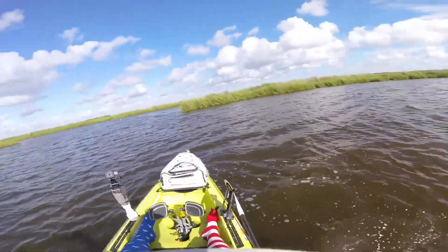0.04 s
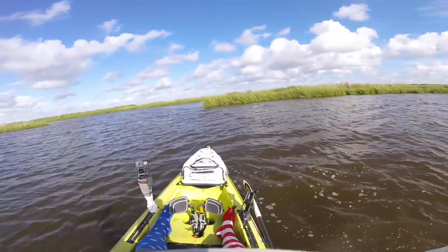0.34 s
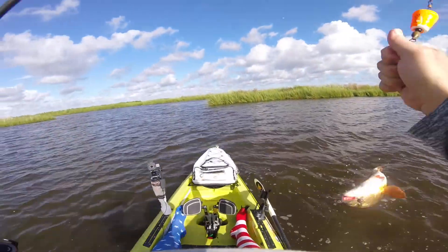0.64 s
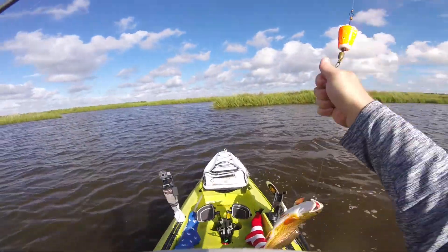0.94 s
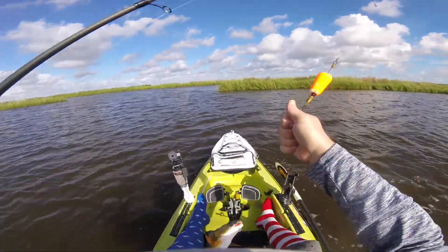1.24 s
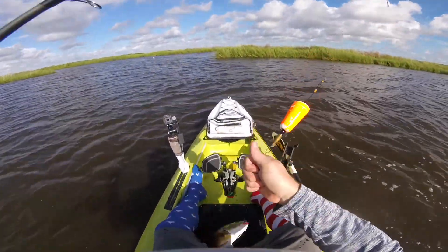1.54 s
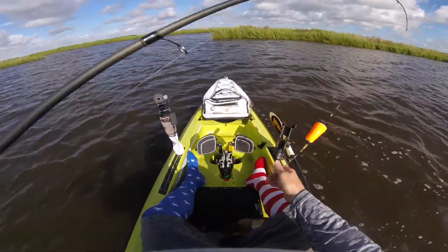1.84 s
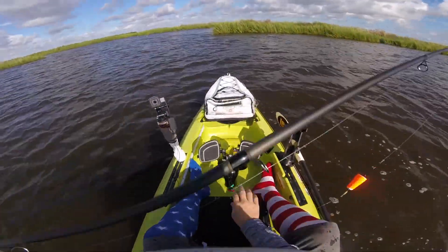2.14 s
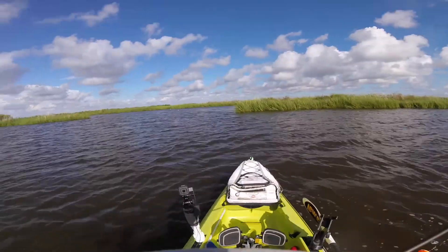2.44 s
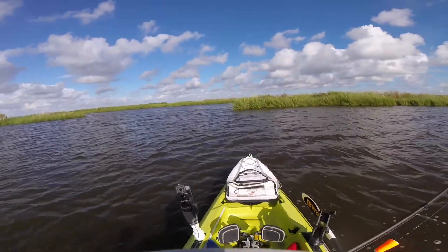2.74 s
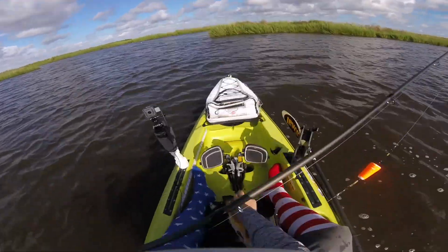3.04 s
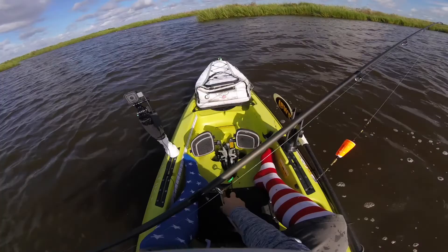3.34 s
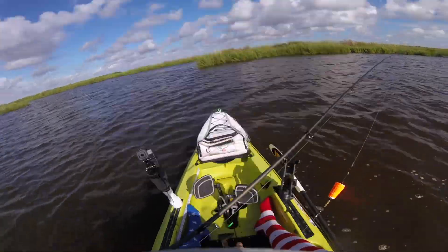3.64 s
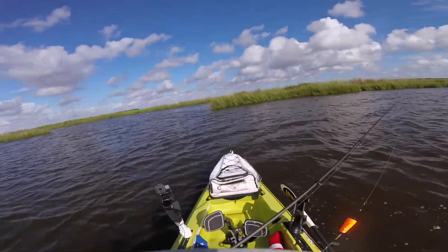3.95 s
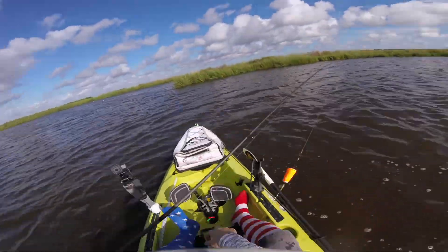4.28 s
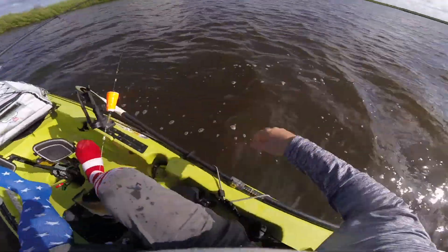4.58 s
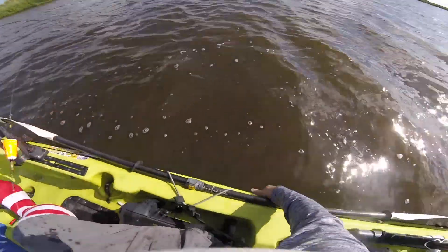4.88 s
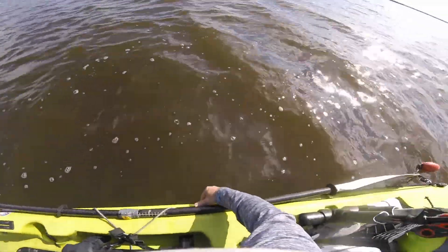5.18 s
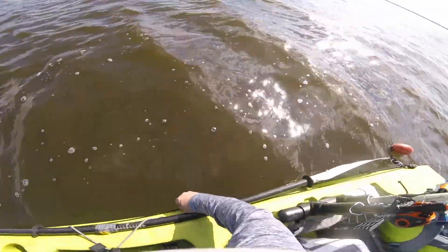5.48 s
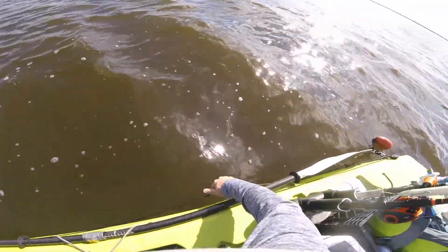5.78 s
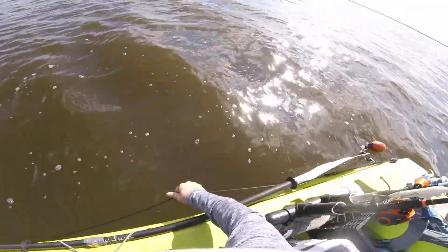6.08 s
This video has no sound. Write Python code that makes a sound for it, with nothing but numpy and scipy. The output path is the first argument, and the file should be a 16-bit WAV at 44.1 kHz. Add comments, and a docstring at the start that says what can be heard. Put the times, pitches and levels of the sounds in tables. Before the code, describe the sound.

Over low wind and rustling sleeves, beads clack brightly inside a plastic fishing float as a small fish lands in the angler's lap with soft thuds. Water gives one faint plip. Then a rod and gear knock and clatter on the hollow plastic hull of the kayak. A faint thin whistle comes and goes, and wind buffets the close microphone hard for the last two seconds.

```python
"""Over low wind and rustling sleeves, a rattle float clacks as a small fish is swung aboard a kayak.
Beads strike inside the float, the fish thuds into the angler's lap, and marsh water plips once.
Then rod and gear knock on the hollow plastic hull, each impact exciting its resonant modes.
A thin whistle comes and goes, and eddies buffet the microphone, hard in the last two seconds."""
import sys
import numpy as np
from scipy import signal
from scipy.fft import rfft, irfft
from scipy.io import wavfile
from scipy.ndimage import uniform_filter1d

SR = 44100
rng = np.random.default_rng(int(sys.argv[2]) if len(sys.argv) > 2 else 0)


def int16_out(signal):
    """Quantize to a 16-bit WAV file."""
    q = np.round(np.clip(np.atleast_2d(signal).T, -1, 1) * 32767)
    wavfile.write(sys.argv[1], SR, q.astype(np.int16))


N = 278660
TIME = np.arange(N) / SR


def amp(db):
    """The decibel scale: 20 dB is a factor of ten in amplitude."""
    return 10 ** (np.asarray(db) / 20)


def unit_rms(x):
    """Normalisation to a mean power of 1."""
    return x / np.sqrt(np.mean(x ** 2) + 1e-20)


def unit_energy(x):
    """Normalisation to a total energy of 1."""
    return x / (np.linalg.norm(x) + 1e-12)


def gain_at(spectrum, hz):
    """Spectral envelope: decibels interpolated over log frequency, returned as amplitude."""
    points_hz, level_db = np.transpose(spectrum)
    return amp(np.interp(np.log(hz + 1), np.log(points_hz + 1), level_db))


def follow(rows, column):
    """Linear interpolation of one column over time."""
    rows = np.asarray(rows)
    return np.interp(TIME, rows[:, 0], rows[:, column])


def swell(peak_s, length_s):
    """A raised-cosine envelope of height 1."""
    return np.cos(np.pi * np.clip((TIME - peak_s) / length_s, -.5, .5)) ** 2


def decay(t, t60):
    """Exponential damping: 60 dB down after t60 seconds."""
    return np.exp(-np.log(1000) * t / t60)


def add(mix, start_s, sound):
    """Superposition: a sound adds to the mix from start_s on."""
    part = mix[max(round(start_s * SR), 0):][:len(sound)]
    part += sound[:len(part)]


def noise(spectrum):
    """Spectral shaping of white noise, at rms 1."""
    gain = gain_at(spectrum, np.fft.rfftfreq(N, 1 / SR))
    return unit_rms(irfft(rfft(rng.standard_normal(N)) * gain, N))


def drift(hz):
    """Random modulation: noise of rms 1, low-passed near hz."""
    gain = np.exp(-(np.fft.rfftfreq(N, 1 / SR) / hz) ** 2)
    return unit_rms(irfft(rfft(rng.standard_normal(N)) * gain, N))


def shortest_pulse(spectrum, size=4096):
    """Minimum phase: the most compact causal pulse with this spectrum."""
    log_gain = np.log(gain_at(spectrum, abs(np.fft.fftfreq(size, 1 / SR))))
    return np.fft.ifft(np.exp(np.conj(signal.hilbert(log_gain)))).real


def jostle(bouts, edge_db, spread_db, count=6):
    """Random impacts (start_s, level_db) in each bout; edge_db sets the ends' level against the middle."""
    contacts = []
    for middle_s, length_s, db in bouts:
        place = (np.arange(count) + rng.random(count)) / count - .5
        level_db = db + edge_db * (2 * place) ** 2 + spread_db * rng.standard_normal(count)
        contacts += zip(middle_s + length_s * place, level_db)
    return contacts


def impacts(rows, modes, crack_spectrum, edges_hz, attack_s, crack_t60, crack_db, snap_db,
            tail_t60, tail_db, scatter_db, mistune=.01, heft=0):
    """Modal synthesis: damped modes plus a noisy crack. A row is start_s, then level_db for each band."""
    t, out = np.arange(SR // 5) / SR, np.zeros(N)
    hz, db, t60 = np.transpose(modes)[:, :, None]
    pulse, fade = shortest_pulse(crack_spectrum), decay(t, t60)
    crack_envelope = decay(t, crack_t60) + amp(tail_db) * decay(t, tail_t60)
    bands = [signal.butter(4, band, "band", fs=SR, output="sos") for band in zip(edges_hz, edges_hz[1:])]
    for start_s, *levels_db in rows:
        # the place of contact decides how strongly each mode answers
        place, detune = rng.standard_normal((2, len(hz), 1))
        partials = amp(db + scatter_db * place) * fade * np.sin(2 * np.pi * hz * (1 + mistune * detune) * t)
        # with heft, a heavy blow flexes the whole body and favours its lowest modes
        flex = amp(heft * max(levels_db[0] + 18.5, -10) * (hz < 350))
        ring = (flex * partials).sum(0) / np.linalg.norm(partials.sum(0))
        burst = unit_energy(rng.standard_normal(len(t)) * crack_envelope)
        snap = amp(snap_db) * (t == 0)
        crack = signal.fftconvolve(burst + snap, pulse)[:len(t)]
        blow = ring + amp(crack_db) * unit_energy(crack)
        for band, level_db in zip(bands, levels_db):
            part = signal.sosfilt(band, blow)
            attack_rms = np.sqrt(np.mean(part[:round(attack_s * SR)] ** 2))
            add(out, start_s, amp(level_db) * part / attack_rms)
    return out


# background hiss: frequency_hz, level_db
AIR_SPECTRUM = [(100, 11), (400, 15.5), (900, -2), (1500, -3.5), (3000, -5.5), (5500, -7),
                (10000, -8), (15000, -4.5)]
def air():
    """Stationary noise: the still marsh air and the microphone's own hiss."""
    return amp(-65.5) * noise(AIR_SPECTRUM)


WIND_LEVELS = [(0, -34, -53.5), (.7, -35, -46), (1.35, -30, -41), (1.8, -31, -48.5), (2.05, -41, -53),
               (2.5, -33, -51), (2.85, -35.5, -33), (3.05, -38, -38), (3.2, -34, -36.5), (3.45, -36, -46),
               (3.75, -24, -43), (4.08, -19.5, -38.5), (4.3, -14.5, -28), (4.55, -21, -27.5),
               (5.3, -19.5, -24.5), (6.05, -18.5, -28), (6.32, -15, -39)]  # wind on the microphone: time_s, buffet_db, flutter_db
GUSTS = [(0.093, 0.18, -27.5), (1.071, 0.078, -26.5), (1.189, 0.093, -11), (1.344, 0.29, -26),
         (2.786, 0.16, -21), (4.209, 0.12, -16.5), (4.388, 0.11, -18), (5.025, 0.085, -20),
         (5.561, 0.056, -18)]  # puffs from gusts and quick movements: peak_s, length_s, level_db
BUFFET_SPECTRUM = [(5, -9.5), (14, 1), (28, 1), (50, -8), (70, -16.5), (110, -24), (200, -44.5),
                   (500, -82.5)]  # large eddies: frequency_hz, level_db
FLUTTER_SPECTRUM = [(30, -15.5), (65, 6.5), (100, 5), (160, -6.5), (250, -13), (400, -22), (700, -32),
                    (1500, -51), (4000, -64.5)]  # small eddies: frequency_hz, level_db
def wind():
    """Turbulent pressure: large eddies push on the microphone port and smaller ones flutter above them."""
    eddies = noise(BUFFET_SPECTRUM)
    eddies /= np.sqrt(uniform_filter1d(eddies ** 2, size=6000) + 0.023)  # even out their own slow swell
    breeze_db = follow(WIND_LEVELS, 1)
    puffs = sum(amp(db) * swell(peak_s, length_s) for peak_s, length_s, db in GUSTS)
    gust_db = 20 * np.log10(amp(breeze_db + 1.5 * drift(8)) + puffs)
    pace = np.clip(amp(.25 * (gust_db + 22)), .4, 1.15)  # a light breeze carries eddies past more slowly
    eddies = np.interp(np.cumsum(pace), np.arange(N), eddies, period=N)
    flutter = noise(FLUTTER_SPECTRUM)
    flutter_db = follow(WIND_LEVELS, 2) + .3 * (gust_db - breeze_db) + 2 * drift(7.2)
    return eddies * amp(gust_db) + flutter * amp(flutter_db)


WHISTLES = [(0.177, .3, 4200, -66), (1.806, 0.9, 4280, -72), (2.54, 0.55, 3720, -71.5),
            (4.701, 0.59, 4450, -77), (5.248, 0.62, 3743, -75.5)]  # thin tones: start_s, length_s, pitch_hz, level_db
def whistle(fade_s=0.089):
    """Frequency modulation: a faint tone, perhaps wind on the line, sways about five times a second."""
    sway = np.sin(2 * np.pi * np.cumsum(5 + .8 * drift(4.3)) / SR)
    waver_hz = 35 * sway + 15 * drift(8.5) + 22 * drift(200)
    out = np.zeros(N)
    for start_s, length_s, pitch_hz, db in WHISTLES:
        fade = np.clip(np.minimum(TIME - start_s, start_s + length_s - TIME) / fade_s, 0, 1)
        out += amp(db) * fade * np.sqrt(2) * np.sin(2 * np.pi * np.cumsum(pitch_hz + waver_hz) / SR)
    return out


RUSTLE = [(0, -54, -62), (.9, -47.5, -62.5), (1.4, -51.5, -65), (1.7, -48.5, -62), (1.9, -62.5, -71),
          (2.45, -60.5, -73), (3.1, -55, -69.5), (4.3, -57, -67), (5.85, -62.5, -72.5), (6.32, -57.5, -69)]  # steady shifting of cloth: time_s, rub_db, hiss_db
SWISHES = [(0.536, 0.083, -43, -40), (0.602, 0.16, -35.5, -65), (1.026, 0.5, -47.5, -52.5),
           (1.226, 0.23, -37, -53), (1.51, 0.12, -47.5, -61), (3.283, 0.21, -50, -79),
           (3.573, 0.24, -51.5, -53.5), (4.121, 0.32, -47, -65), (6.147, 0.5, -60, -64)]  # spray and sleeve: peak_s, length_s, rub_db, hiss_db
# the dull rub, fine hiss and fibre ticks of cloth: frequency_hz, level_db
RUB_SPECTRUM = [(100, -8), (250, 7), (450, 3.5), (750, 1), (1300, -7), (2000, -10.5), (3200, -18.5),
                (6000, -36)]
HISS_SPECTRUM = [(1000, -8.5), (2500, 0.5), (3800, 2.5), (5000, -2), (7000, -3.5), (9000, -2.5),
                 (11500, -5), (15000, -13), (16000, -34)]
FIBRE_SPECTRUM = [(500, -13), (2000, 0.5), (4000, -1), (7500, -4), (11000, -3), (15000, -14)]
def clothing(ticks_per_s=300):
    """Friction noise: cloth rubs in uneven catches, with a hiss and tiny ticks of fibre."""
    rub_gain, hiss_gain = amp(follow(RUSTLE, 1)), amp(follow(RUSTLE, 2))
    for peak_s, length_s, rub_db, hiss_db in SWISHES:
        stroke = swell(peak_s, length_s)
        rub_gain += amp(rub_db) * stroke
        hiss_gain += amp(hiss_db) * stroke
    motion = np.clip(hiss_gain / amp(-68.5), 0, 1)  # a quiet hiss is smooth, a moving sleeve catches
    catches = drift(70) * motion
    fibres = (rng.random(N) < ticks_per_s / SR) * rng.standard_normal(N)
    fibres *= amp(3.5 * np.minimum(rng.exponential(1, N), 4))  # a few stand out
    ticks = unit_rms(signal.fftconvolve(fibres, shortest_pulse(FIBRE_SPECTRUM))[:N])
    rub = noise(RUB_SPECTRUM) * rub_gain * amp(3.7 * catches)
    hiss = (noise(HISS_SPECTRUM) + motion * ticks) * hiss_gain * amp(2.2 * catches)
    return rub + hiss


BUBBLE = (2.04, .065, 950, 1300, -48)  # a plip of water: start_s, length_s, start_hz, end_hz, level_db
def bubble():
    """Bubble resonance: one soft rising tone beside the hull."""
    start_s, length_s, start_hz, end_hz, db = BUBBLE
    out, count = np.zeros(N), round(length_s * SR)
    pitch_hz = np.linspace(start_hz, end_hz, count) + 40 * drift(250)[:count]
    add(out, start_s, amp(db) * np.hanning(count) * np.sin(2 * np.pi * np.cumsum(pitch_hz) / SR))
    return out


FLOPS = [(0.2, -48, -44, -38.5), (0.54, -54, -32.5, -39), (0.68, -60, -27.5, -41), (0.7, -67, -31.5, -52),
         (0.841, -27.5, -33.5, -45.5), (0.872, -29, -27, -39.5), (0.955, -65, -32, -34),
         (1.174, -19.5, -26.5, -45.5), (1.191, -28, -17.5, -29), (1.205, -25, -56, -35.5),
         (1.246, -33, -17.5, -38), (1.261, -34, -26, -42), (1.322, -31, -27.5, -42), (1.36, -36, -31, -69),
         (1.415, -37, -35, -73)]  # soft blows on clothing: start_s, push_db, thud_db, slap_db
LAP_BANDS = [30, 150, 600, 1500]  # bounds of push, thud and slap: edge_hz
LAP_MODES = [(49.8, 5, 0.17), (136, -5.5, 0.12), (286, 1, 0.096), (388, 1.5, 0.023), (527, -24, 0.018),
             (820, -19, 0.011)]  # resonances of the lap: pitch_hz, level_db, t60_s
LAP_CRACK = [(30, 12), (300, -3.5), (700, -7), (1500, -15.5), (4000, -3)]  # contact noise: frequency_hz, level_db
def lap_flops():
    """Damped impact: fish and arm land on a clothed lap with low thuds."""
    return amp(-0.5) * impacts(
        FLOPS, LAP_MODES, LAP_CRACK, LAP_BANDS, attack_s=0.016, crack_t60=0.097, crack_db=5.5,
        snap_db=-7.5, tail_t60=0.27, tail_db=-28.5, scatter_db=3.0)


KNOCKS = [(2.4653, -39.5, 7.5, -18), (2.5472, -40.5, 9, 1), (2.588, -24, -6.5, 2.5), (2.6069, -42.5, 12, 9),
          (2.6305, -33.5, -11, -4), (2.687, -42, -9, -10), (2.7136, -31, -9, -4), (2.7306, -20.5, -3, -4),
          (2.7362, -9, 5.5, 8), (2.7516, -28.5, -9, 4), (2.7656, -20, -18, 9), (2.7695, -28, -4, 7),
          (2.792, -37.5, 13.5, 7), (2.808, -31.5, -12, -2.5), (2.8194, -41, 4, 2), (2.8562, -38, 12, -1),
          (2.8753, -33, 5, 3), (2.8824, -27.5, -3.5, 3), (2.9034, -42, 11.5, -18), (3.0019, -44, 0, -14.5),
          (3.0841, -40.5, -8, -15), (3.179, -39.5, 16, 10), (3.216, -45.5, 14.5, 12), (3.2353, -37, 6, 9),
          (3.2938, -26, 5.5, 10.5), (3.2974, -33.5, 10.5, 5), (3.3749, -46, -6, 15), (3.4895, -37, -12, -2),
          (3.5114, -33, -6, -10), (3.5262, -26, -4, -10), (3.543, -20, 7, -6), (3.5485, -21, 4, 6.5),
          (3.5501, -18, 8.5, -15), (3.5843, -37, 14, -8), (3.604, -22.5, -29, -18), (3.6133, -31.5, 8.5, 1),
          (3.6433, -34, 2, -0.5), (3.703, -32.5, -2.5, -16), (3.8452, -46.5, 18, 0), (3.96, -40.5, 4.5, 2),
          (4.0741, -40, 3, -2), (4.2948, -41, 6.5, 7.5), (4.3584, -35, 1, 3), (4.4241, -45.5, 11, -7),
          (4.4602, -39, 0, 9), (4.4698, -38, 0, 0), (4.6284, -34.5, 4.5, 10.5), (4.8699, -48.5, 12.5, -4),
          (5.0835, -43.5, 9, 12.5), (5.1377, -34, 5.5, 6), (5.1524, -30, 1, -9), (5.5872, -40.5, 16, 7.5),
          (5.6803, -53, 18, 14.5), (5.9873, -50, 2.5, 12.5), (6.044, -38, -1, 4)]  # gear striking the hull: start_s, level_db, weight_db, hardness_db
SHIFTING = [(2.63, 0.13, -47), (3.03, .14, -50), (3.24, 0.19, -43.5), (3.57, 0.18, -40.5),
            (3.75, 0.23, -50.5), (4.1, .25, -48), (4.75, .6, -54.5), (5.16, .18, -44.5), (5.42, .25, -55)]  # bouts of gear shifting on deck: middle_s, length_s, level_db
HULL_BANDS = [118, 700, 2100, 5000, 16000]  # bounds of boom, knock, clack and tick: edge_hz
HULL_MODES = [(108, 3, .16), (213, 7, .11), (240, 3, .07), (316, 5, .09), (375, -6, .05), (460, -4, .045),
              (575, -8, .04), (690, -7, .04), (805, -1, .055), (1000, -1, .05), (1245, -8, .03),
              (1370, 0, .035), (1462, -1, .045), (1582, 1, .055), (1700, 0, .04), (1860, -7, .035),
              (2325, -5, .035), (2560, -3, .035), (2830, -9, .025), (3280, -7, .025), (3790, -9, .025),
              (4300, -8, .02)]  # resonances of the hull: pitch_hz, level_db, t60_s
HULL_CRACK = [(80, 0.5), (300, 4.5), (900, -3), (1150, 1), (1550, 1.5), (2100, -8), (2700, -7),
              (4400, -12.5), (5300, -18), (7500, -10), (11000, -15.5), (15500, -27.5)]  # contact noise: frequency_hz, level_db
def hull_knocks():
    """Shell resonance: rod, reel and tackle bounce on the hull; weight makes it boom, hardness clack."""
    loose_weight_db, loose_hardness_db = 10, -5  # loose tackle lands dully
    contacts = []
    for s, db, weight, hardness in KNOCKS:  # each knock rebounds, then loose tackle settles
        rebound_s, settle_s = np.array([.0045, .034]) * (.6 + 0.74 * rng.random(2))
        contacts += [(s, db, weight, hardness),
                     (s + rebound_s, db - 13.5, min(weight, loose_weight_db), hardness + loose_hardness_db),
                     (s + settle_s, db - 19.5, loose_weight_db, loose_hardness_db)]
    for s, db in jostle(SHIFTING, edge_db=-9.5, spread_db=1.5):
        contacts.append((s, db, loose_weight_db, loose_hardness_db))
    rows = [(s, db + weight, db, db - 14.5 + hardness, db - 31.5 + 0.94 * hardness)
            for s, db, weight, hardness in contacts]
    return amp(-0.86) * impacts(
        rows, HULL_MODES, HULL_CRACK, HULL_BANDS, attack_s=0.0064, crack_t60=0.024, crack_db=-2.5,
        snap_db=-14, tail_t60=0.15, tail_db=-31, scatter_db=6, mistune=0.011, heft=0.41)


CLACKS = [(.1186, -38, 3.5), (.1633, -44, 2), (.2714, -41.5, 1), (.3785, -55.5, -8), (.3968, -51, 7.5),
          (.429, -44.5, 4), (.4845, -39.5, 10.5), (.4909, -34.5, 0.5), (.6998, -44, 1), (.8329, -46, -2.5),
          (.9011, -48, -4), (.9287, -35.5, 0), (.9683, -33, -1), (1.01, -29.5, -8.5), (1.0129, -24, 0.5),
          (1.0606, -38, -3), (1.0744, -28.5, -1), (1.0807, -29.5, -3), (1.1017, -22.5, -0.5),
          (1.154, -32, 0), (1.161, -20.5, -1), (1.1638, -21, 0.5), (1.1739, -29.5, -7), (1.2082, -26, -1.5),
          (1.2614, -27.5, 2.5), (1.2776, -32, 4), (1.3046, -36.5, -1.5), (1.338, -50, 0),
          (1.4056, -42.5, 1.5), (1.4343, -42, -8.5), (1.4471, -41, -3), (1.5321, -46.5, 0.5),
          (1.71, -52, -3), (1.7734, -39, -0.5), (1.8135, -44.5, -1.5), (1.8247, -44.5, 3), (1.8516, -51, 0),
          (1.9274, -54, 4), (2.4293, -49.5, -3.5), (2.7366, -34, 2), (3.2347, -44, -11), (3.3289, -47.5, 0),
          (3.5475, -41.5, 7), (3.8455, -54.5, 0.5), (5.1518, -49, 3), (5.4904, -56, 4), (5.5241, -58, 4)]  # bead strikes: start_s, level_db, brightness_db
SHAKING = [(.42, 0.098, -53), (.92, 0.14, -47), (1.065, .05, -40), (1.19, 0.091, -44.5),
           (1.3, 0.068, -41.5)]  # bouts of the float shaking: middle_s, length_s, level_db
FLOAT_BANDS = [700, 3000, 8600, 16000]  # bounds of shell, ring and tick: edge_hz
FLOAT_MODES = [(1370, 3.5, 0.0044), (1660, -8, 0.011), (2300, -5.5, 0.0078), (3085, -12, 0.058),
               (3795, 4.5, 0.034), (5370, 6.5, 0.028), (5630, -3.5, 0.056), (5940, 5, 0.05),
               (7260, 4, 0.012), (7860, 3, 0.025), (8430, -1.5, 0.022), (9330, 2.5, 0.018),
               (12230, 2, 0.02), (15000, -41, 0.0083)]  # resonances of the float: pitch_hz, level_db, t60_s
FLOAT_CRACK = [(400, -13), (1200, -1), (3000, -5.5), (4400, 2.5), (6000, 10.5), (7800, 4), (8800, -12),
               (9800, -2), (11000, -5.5), (13500, -15.5), (15200, 3)]  # contact noise: frequency_hz, level_db
def rattle_float():
    """Impulse excitation: hard beads ring a small plastic float; bright clacks have more tick, less shell."""
    clacks = CLACKS + [(s, db, 0) for s, db in jostle(SHAKING, edge_db=0.5, spread_db=2)]
    rows = [(s, db - brightness, db, db + brightness) for s, db, brightness in clacks]
    return amp(-2.22) * impacts(
        rows, FLOAT_MODES, FLOAT_CRACK, FLOAT_BANDS, attack_s=0.0098, crack_t60=0.012, crack_db=7,
        snap_db=-13.5, tail_t60=0.049, tail_db=-18.5, scatter_db=4.5, mistune=0.022)


def scene():
    """Superposition of all sources in one channel."""
    catch = rattle_float() + hull_knocks() + lap_flops()
    return (catch + wind() + clothing() + whistle() + bubble() + air())[None]


def record(dry):
    """Soft saturation rounds the loudest peaks; a low-pass filter limits the band to 15.5 kHz."""
    rounded = dry / (1 + dry ** 6) ** (1 / 6)
    low_pass = signal.firwin(201, 15500, window=("kaiser", 9), fs=SR)
    return signal.oaconvolve(rounded, low_pass[None], "same")


dry = scene()
out = record(dry)
int16_out(out)
```